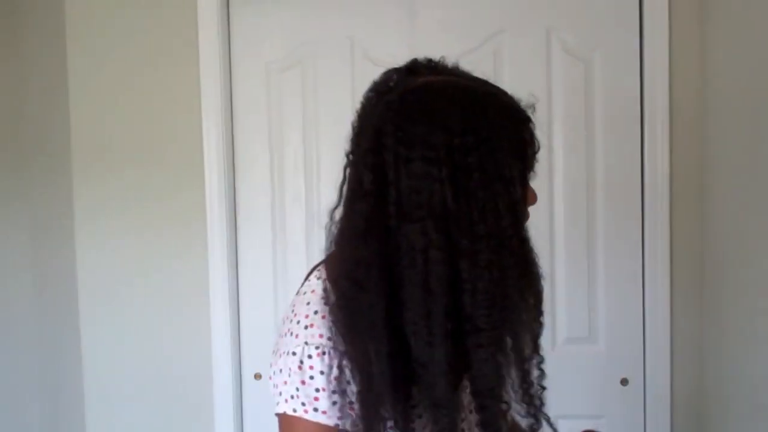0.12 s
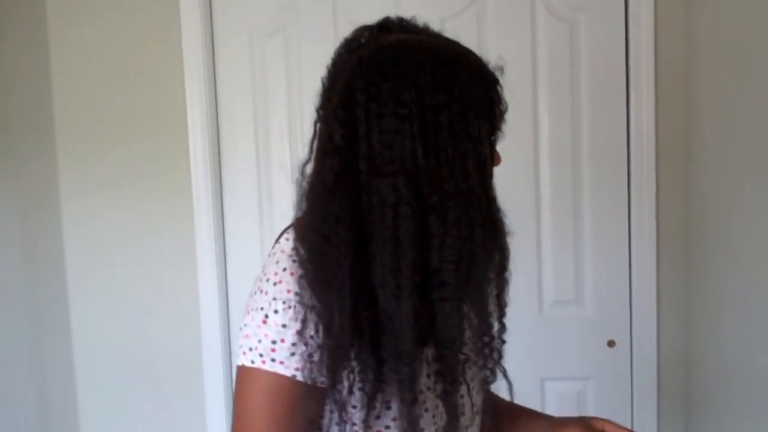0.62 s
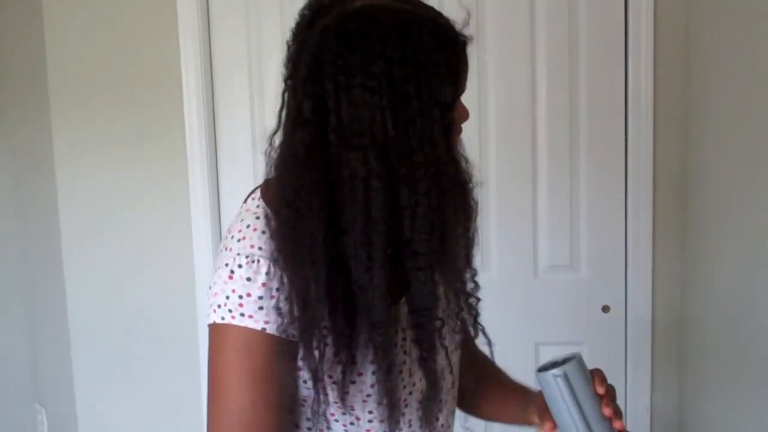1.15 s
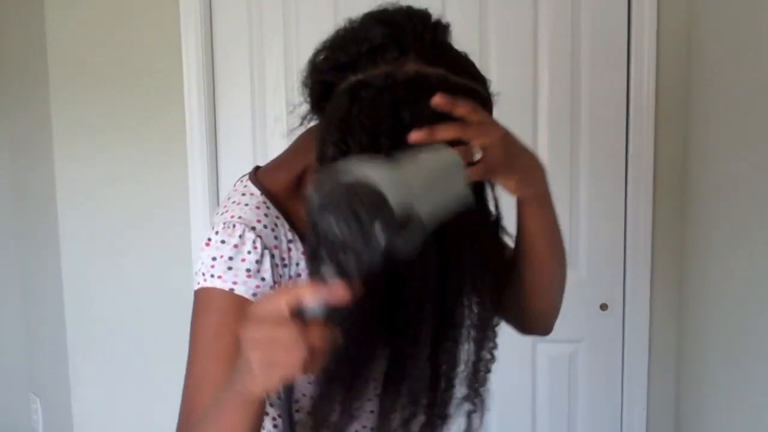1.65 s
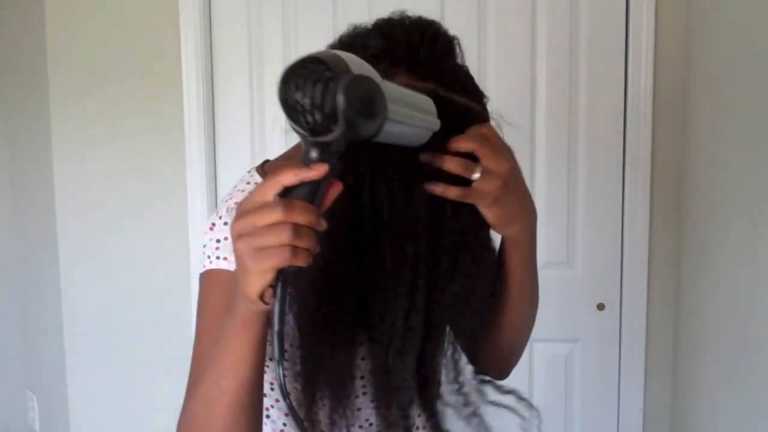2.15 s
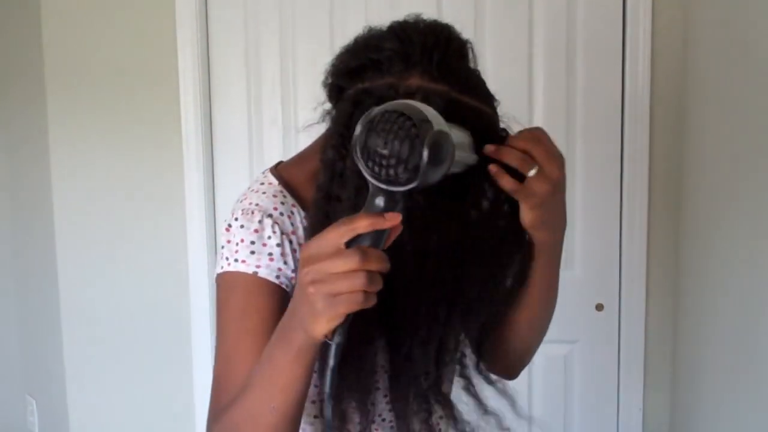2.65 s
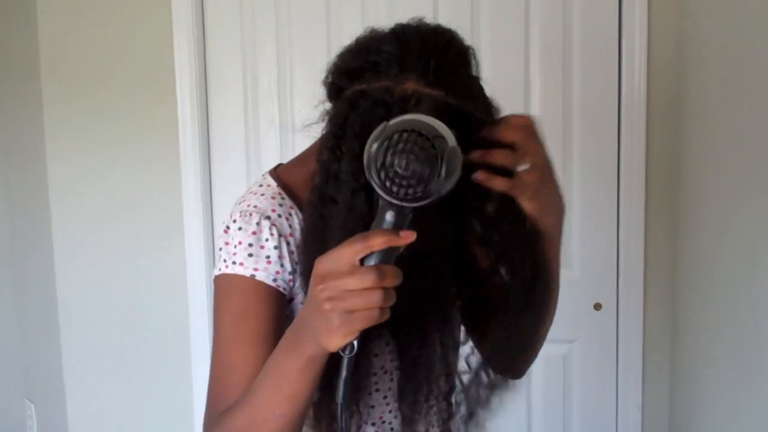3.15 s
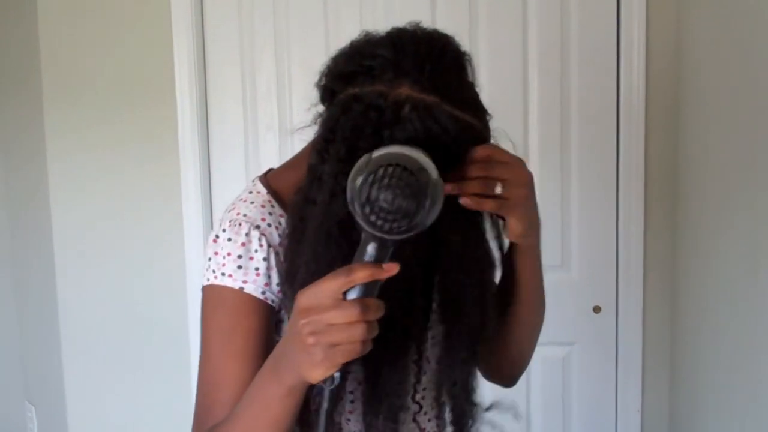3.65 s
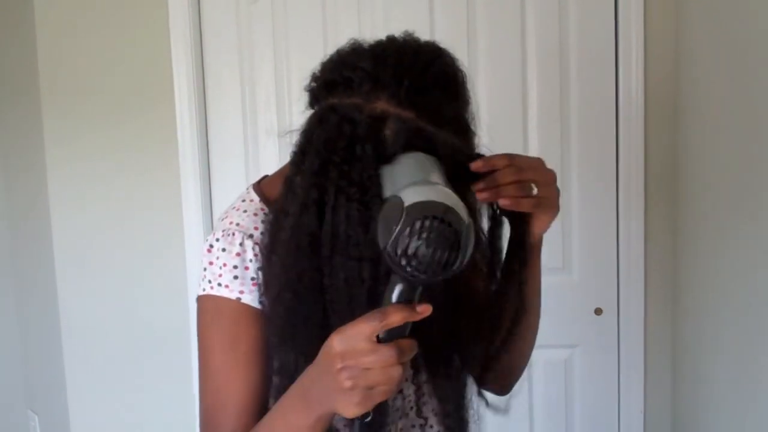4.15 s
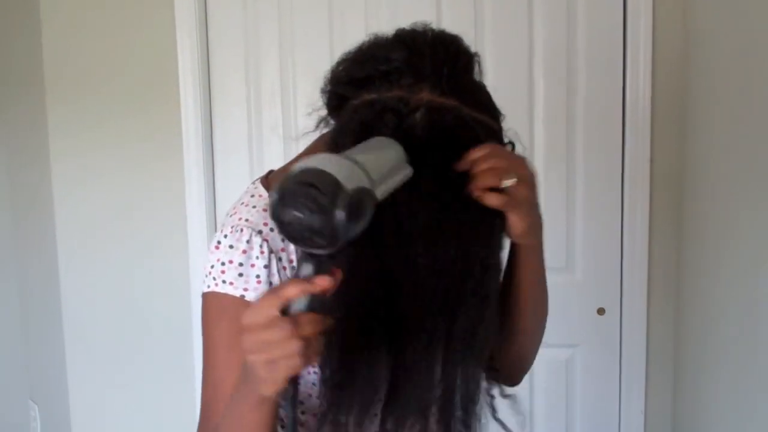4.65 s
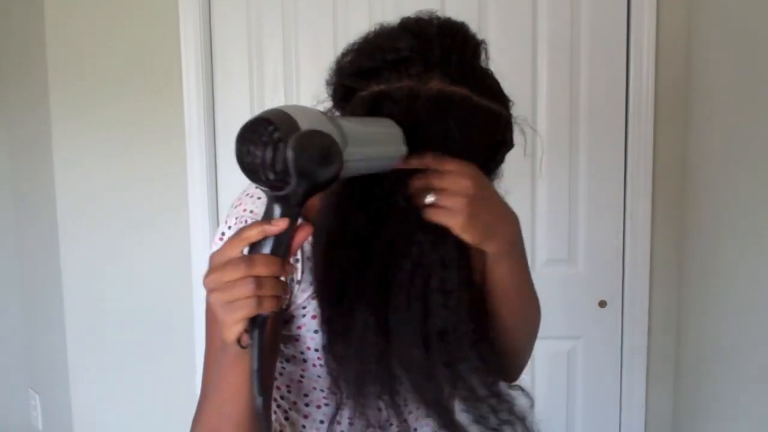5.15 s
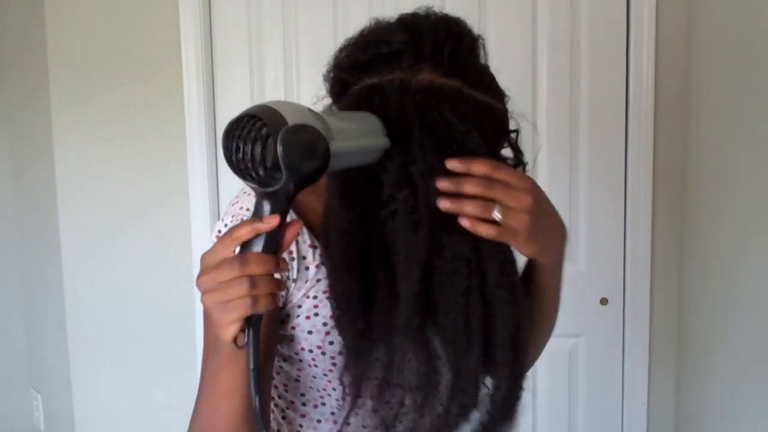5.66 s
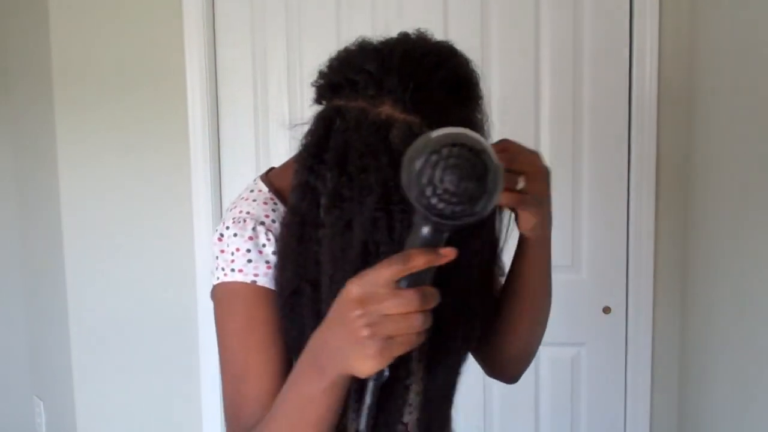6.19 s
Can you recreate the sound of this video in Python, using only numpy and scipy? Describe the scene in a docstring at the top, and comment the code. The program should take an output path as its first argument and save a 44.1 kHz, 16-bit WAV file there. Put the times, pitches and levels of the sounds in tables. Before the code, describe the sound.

Plastic clicks and a small scrape, then a handheld hair dryer buzzes on, spins up to a thin whine and blows steadily in a small hard room.

```python
"""A handheld hair dryer is picked up and clicked on in a small hard room, then turned about the head.
Its air is shaped noise: roar in room and barrel modes, turbulence at the blades, hiss at the grille, brief whistles.
Its motor is a stack of sines on the shaft orders that spins up to a thin whine, after a short mains buzz.
Noise bursts and damped sines make the clicks, and soft noise swells the scrapes, as the dryer is handled.
Behind it the house adds a faint wavering rumble, low hum tones, one distant thud and a soft hiss."""
import sys
import numpy as np
from scipy import signal
from scipy.fft import rfft, irfft, next_fast_len
from scipy.io import wavfile
from scipy.ndimage import uniform_filter1d, map_coordinates

SR = 44100
rng = np.random.default_rng(int(sys.argv[2]) if len(sys.argv) > 2 else 0)


def linear_from_db(decibels):
    """Turn decibels (scalar or array-like) into linear amplitude factors; 0 gives 1."""
    return 10 ** (np.asarray(decibels, float) / 20)


def transcribe(signal):
    """Save signal, clipped to [-1, 1], as a 16-bit WAV file at the path in sys.argv[1]."""
    frames = np.atleast_2d(signal).T
    limited = np.clip(frames, -1, 1)
    pcm = np.round(limited * 32767).astype(np.int16)
    wavfile.write(sys.argv[1], SR, pcm)


N = 277830  # length in samples

# mean shaft speed through the spin-up: (time [s], speed [turns per second])
SHAFT_SPEED = [(0.59, 20), (0.7, 102), (0.77, 137), (0.84, 171), (1, 222), (1.1, 243.5), (1.2, 255),
               (1.3, 263.5), (1.4, 267.6), (1.55, 269.7), (1.7, 273.4), (1.9, 277.1), (2.2, 278.3),
               (2.45, 278.7), (3, 278), (3.8, 278.5), (6.3, 278)]
# left-right likeness of sound from all round the room: (frequency [Hz], likeness [0-1])
DIFFUSE_LIKENESS = [(40, 0.94), (80, 1), (150, 0.94), (450, 0.75), (900, 0.61), (1600, 0.55), (3200, 0.16),
                    (6000, .02)]


def unit(x):
    """Scaled to rms 1."""
    return x / np.sqrt(np.mean(x ** 2) + 1e-20)


def along(points, hz):
    """Value at hz of (Hz, value) points on a log frequency axis."""
    f, v = np.transpose(points)
    return np.interp(np.log(hz + 1), np.log(f + 1), v)


def curves(rows, outside=-120):
    """One value per sample for each column after the time; a set value outside the table."""
    s, *columns = np.transpose(rows)
    t = np.arange(N) / SR
    return [np.interp(t, s, column, left=outside, right=outside) for column in columns]


def wobble(rate):
    """A smooth random curve, rate knots a second."""
    at = np.arange(0, N + 64, 64)
    knots = rng.standard_normal(int(N * rate / SR) + 4)
    return np.interp(np.arange(N), at, map_coordinates(knots, [at * rate / SR]))


def bump(s, width_s):
    """A bell-shaped swell of height 1 and standard deviation width_s."""
    return np.exp(-.5 * ((np.arange(N) / SR - s) / width_s) ** 2)


def filtered(x, response):
    """x filtered by a complex response of frequency."""
    m = next_fast_len(x.shape[-1] + 8192)
    spectrum = rfft(x, m) * response(np.fft.rfftfreq(m, 1 / SR))
    return irfft(spectrum, m)[..., :x.shape[-1]]


def modes(table, steep):
    """Power sum of (Hz, width Hz, dB) resonance peaks; steep over 1 darkens the skirts."""
    return lambda f: np.sqrt(sum(linear_from_db(2 * db) * (1 + (2 * (f - c) / w) ** 2) ** -steep for c, w, db in table))


def shape(spectrum):
    """Gain of a (Hz, dB) spectrum."""
    return lambda f: linear_from_db(along(spectrum, f))


def spread(pair, likeness):
    """Two unrelated signals to left and right, sharing as much at each frequency as likeness says."""
    turn = lambda hz: np.arccos(np.clip(along(likeness, hz), 0, 1)) / 2
    mid, side = filtered(pair, lambda hz: np.array([np.cos(turn(hz)), np.sin(turn(hz))]))
    return np.array([mid + side, mid - side])


def rush(colour, patchy_db, frames=12, likeness=None):
    """Stereo noise of rms 1 in patches of random gain; long ones drift as the dryer moves among reflections."""
    # left-right likeness of the near dryer: (frequency [Hz], likeness [0-1])
    near_likeness = [(150, 0.96), (380, 0.98), (950, 0.87), (2370, 0.62), (5000, 0.21), (8000, 0.44),
                     (14900, 0.11)]
    z = signal.stft(rng.standard_normal((2, N)), nperseg=512)[2]
    field = uniform_filter1d(rng.standard_normal(z.shape[1:]), size=2, axis=0)
    for _ in range(2):
        field = uniform_filter1d(field, size=frames, axis=1)
    pair = signal.istft(z * linear_from_db(patchy_db * unit(field)), nperseg=512)[1][:, :N]
    return unit(spread(filtered(pair, colour), near_likeness if likeness is None else likeness))


def layer(full_db, power, aim_db):
    """A level in dB that follows a power of shaft speed and how far the nozzle is in view."""
    # barrel opening toward the microphone: (time [s], aim [0 intake grille in front, 1 nozzle in view])
    aim = [(0.59, 0.52), (0.9, 1.14), (1.13, 1.13), (1.43, .95), (1.55, 0.45), (1.75, 0.43), (1.95, 0.45),
           (2.15, 0.57), (2.4, 0.12), (3.0, 0.34), (3.55, -0.11), (3.9, 0.49), (4.55, 0.13), (4.95, 0.55),
           (5.15, 0.35), (5.4, 0.73), (5.55, 0.81), (5.75, 0.44), (6.3, -0.33)]
    full_hz = 249  # above this shaft speed the level stops growing
    speed = curves(SHAFT_SPEED, outside=.01)[0]
    growth_db = power * 20 * np.log10(np.minimum(speed / full_hz, 1))
    return full_db + growth_db + aim_db * curves(aim, outside=0)[0]


def barrel_roar(slow):
    """Turbulent flow excites low room modes and the barrel's first and second mode."""
    # resonances of room, first and second barrel mode: (frequency [Hz], width [Hz], level [dB])
    room_modes = [(231.5, 40, -6.5), (328, 28, -4.5), (384, 76, -1.5), (486, 11.4, 0.5), (542, 56, 2)]
    first_mode = [(615, 25, -5), (675, 50, 1), (755, 110, -1.5), (850, 45, -4), (970, 200, -5)]
    second_mode = [(1643, 60, 1.5), (1473, 260, -2.5)]
    room = rush(modes(room_modes, steep=2.07), patchy_db=0.5)
    first = rush(modes(first_mode, steep=1.44), patchy_db=1.65, frames=slow)
    second = rush(modes(second_mode, steep=1.56), patchy_db=4.5)
    return (linear_from_db(layer(full_db=-44, power=1.26, aim_db=1.1)) * room
            + linear_from_db(layer(full_db=-34, power=1.84, aim_db=4.8)) * first
            + linear_from_db(layer(full_db=-43, power=3.2, aim_db=11)) * second)


def barrel_whistle():
    """The barrel whistles briefly near its second mode: swelling sines whose phase drifts."""
    # whistles: (time of the peak [s], rise and fall [s], pitch [Hz], level [dB])
    whistles = [(1.43, .02, 1560, -31), (4.95, .12, 1625, -39), (5.51, .075, 1635, -32.5)]
    phase = 2 * np.pi * np.arange(N) / SR
    drift = .7 * wobble(30)
    return sum(linear_from_db(db) * bump(s, width) * np.sqrt(2) * np.sin(hz * phase + drift)
               for s, width, hz, db in whistles)


def blade_turbulence(slow):
    """Broad noise of turbulence at the blades, growing with shaft speed."""
    # spectrum of the turbulence: (frequency [Hz], density [dB per Hz])
    turbulence = [(900, -41), (1150, -6), (1300, -8), (1500, -1.5), (2000, 0.5), (2350, -1), (2900, 0),
                  (3450, -0.5), (3700, -5), (5000, -20.5)]
    noise = rush(shape(turbulence), patchy_db=1.0, frames=slow)
    return linear_from_db(layer(full_db=-25.5, power=2.8, aim_db=0.84)) * noise


def grille_hiss(slow):
    """Air hisses at the grille; the top of the hiss needs more speed to start."""
    # spectrum of the hiss: (frequency [Hz], density [dB per Hz])
    hiss_spectrum = [(2400, -56), (3300, -12.5), (3800, -5.5), (4550, -1.5), (5940, -2.5), (9930, -6),
                     (13700, -3), (14300, -9)]
    split_hz = 5200
    hiss = rush(shape(hiss_spectrum), patchy_db=0.67, frames=slow)
    top = filtered(hiss, lambda hz: 1 / (1 + (split_hz / (hz + 1)) ** 4))
    return (linear_from_db(layer(full_db=-22.5, power=3.3, aim_db=1.14)) * (hiss - top)
            + linear_from_db(layer(full_db=-21, power=3.9, aim_db=-1.2)) * top)


def air():
    """All the flow noise of the dryer; eddies flutter the whole stream a little."""
    slow = 50  # smoothing of the slow patches, in frames of 256 samples
    low_hz = 205  # the small fan radiates almost nothing below this
    flutter_db = 0.45 * wobble(5.8) + 0.28 * wobble(25)
    stream = barrel_roar(slow) + barrel_whistle() + blade_turbulence(slow) + grille_hiss(slow)
    return filtered(linear_from_db(flutter_db) * stream, lambda hz: 1 / np.sqrt(1 + (low_hz / (hz + 1)) ** 10))


def motor():
    """Shaft orders on a slightly unsteady speed; each reaches the two ports a little differently."""
    # the two blade tones: (time [s], level of order 4 [dB], level of order 8 [dB])
    whine = [(0.72, -54, -64), (0.84, -38, -64), (0.95, -61, -61), (1.03, -33, -32), (1.07, -46, -48),
             (1.2, -41, -34), (1.32, -27.5, -46), (1.48, -34, -39), (1.56, -41, -30.5), (1.66, -29.5, -33),
             (1.86, -37, -33), (1.97, -39, -31), (2.08, -34, -39), (2.3, -36, -33), (2.41, -35.5, -27),
             (2.55, -33, -32.5), (2.75, -34, -32.5), (3.2, -32.5, -31), (3.5, -33, -31), (3.84, -33, -30.5),
             (4.17, -33, -38.5), (4.5, -34, -34), (4.72, -36.5, -33), (4.85, -40.5, -38), (5.03, -37, -45),
             (5.12, -39, -29.5), (5.27, -36, -40), (5.4, -34, -30.5), (5.6, -34.5, -39), (5.8, -45, -29.5),
             (5.95, -38, -34), (6.15, -33, -29.5), (6.3, -32, -40)]
    # weak orders: (order, level at full speed [dB], power of speed, gain in nozzle view [dB], random swing [dB])
    weak_orders = [(1, -59, 3.2, 2, 1.8), (5, -54, 1.4, 12, 3)]
    # resonances that a weak order lights up while gliding through: (frequency [Hz], width [Hz], gain [dB])
    passed = [(238, 35, 6), (860, 50, 19), (1125, 60, 10), (1250, 80, 2)]
    speed = curves(SHAFT_SPEED, outside=0)[0]
    turns = 2 * np.pi * np.cumsum(speed + 0.1274 * wobble(6)) / SR  # shaft angle [rad]
    levels = {4 * (i + 1): db + 0.74 * wobble(8.1) for i, db in enumerate(curves(whine))}
    for order, *law, swing_db in weak_orders:
        order = round(order)
        lit_db = sum(db / (1 + (2 * (order * speed - hz) / width) ** 2) for hz, width, db in passed)
        levels[order] = layer(*law) + lit_db + swing_db * wobble(7)
    out = np.zeros((2, N))
    for order, db in levels.items():
        lean = order / 8 * np.array([[1], [-1]])  # opposite left and right, wider for high orders
        waver_db = 2.05 * wobble(35) + lean * (0.74 + 1.4 * wobble(2.33))
        tone = np.sin(order * turns + 0.21 * lean * wobble(1.57))
        out = out + np.sqrt(2) * linear_from_db(db + waver_db) * tone
    return out


def mains_buzz():
    """Mains ripple rings the housing as current first flows: one gliding sine."""
    # the ring: (time [s], pitch [Hz], level [dB])
    ripple = [(0.59, 714, -61), (0.652, 714, -39.5), (0.676, 712, -37), (0.712, 710, -51), (0.75, 720, -34),
              (0.78, 690, -36)]
    pitch = curves(ripple, outside=0)[0]
    level_db = curves(ripple)[1]
    phase = 2 * np.pi * np.cumsum(pitch) / SR
    return np.sqrt(2) * linear_from_db(level_db) * np.sin(phase + [[.25], [-.25]])


def clicks():
    """Each click of handle or switch is a sharp crack, a brief ring and a rattle of the plastic shell."""
    # plastic clicks: (time [s], level [dB], rattle t60 [s], brightness [dB per octave])
    click_table = [(0.0565, -29, 0.063, 1), (0.2276, -34.5, .05, -3.5), (0.272, -35, .04, -2.2),
                   (.2970, -24, 0.078, 2), (.3824, -42, .04, -3), (0.462, -45, .02, 9),
                   (.5352, -31.5, 0.047, -5.5), (0.585, -33, .03, -6), (0.589, -21, 0.041, 3.5),
                   (0.5904, -25.5, 0.03, -2)]
    # spectrum of crack and rattle: (frequency [Hz], density [dB per Hz])
    snap = [(400, -45), (900, -13), (1700, -7), (2830, -3), (3690, -4), (4980, -2.5), (8770, -4),
            (11200, -4), (14200, -5)]
    # modes of the plastic shell: (frequency [Hz], level [dB], t60 [s])
    shell = [(3100, -11, .004), (4900, -6, .004), (6100, -8, .004)]
    out = np.zeros(N)
    t = np.arange(SR // 5) / SR
    for s, db, t60, tilt in click_table:
        bright = lambda f: linear_from_db(tilt * np.log2((f + 100) / 5000))
        crack = linear_from_db(2.5 - 60 * t / 0.007) * rng.standard_normal(len(t))
        rattle = linear_from_db(-5.5 - 60 * t / max(t60, .01)) * rng.standard_normal(len(t))
        burst = filtered(crack + rattle, lambda f: shape(snap)(f) * bright(f))
        ring = sum(bright(hz) * linear_from_db(mode_db - 60 * t / ring_s) * np.sin(2 * np.pi * hz * t)
                   for hz, mode_db, ring_s in shell)
        out[round(s * SR):][:len(t)] += linear_from_db(db) * (burst + ring)
    return out


def scrapes():
    """Dull scrapes of the housing: resonant noise in short swells."""
    # swells: (time of the peak [s], rise and fall [s], level [dB])
    strokes = [(.397, 0.014, -54), (.436, 0.01, -47.5), (.466, .007, -54)]
    # resonances of the scraped housing: (frequency [Hz], width [Hz], level [dB])
    housing = [(510, 90, 3.5), (1380, 900, -7)]
    noise = unit(filtered(rng.standard_normal(N), modes(housing, steep=1.35)))
    return sum(linear_from_db(db) * bump(s, width) for s, width, db in strokes) * noise


def walls(x):
    """Diffuse answer of the hard walls; each frequency dies at its own speed."""
    # decay of the room: (frequency [Hz], t60 [s])
    decay = [(200, 0.22), (2000, 0.32), (10000, 0.16)]
    hz, t, z = signal.stft(rng.standard_normal((2, SR // 2)), SR, nperseg=256)
    fading = z * linear_from_db(-60 * t / along(decay, hz)[:, None])
    tail = spread(signal.istft(fading, SR, nperseg=256)[1], DIFFUSE_LIKENESS)
    delayed = np.pad(x, (160, 0))[None]  # the answer starts 160 samples late
    return signal.fftconvolve(delayed, tail / np.linalg.norm(tail[0]), axes=1)[:, :N]


def house():
    """Distant ventilation: a wavering rumble with low tones, one thud, and a soft hiss."""
    # level of the low sound, which sinks after about 1.3 s: (time [s], level [dB])
    low_level = [(0, -58), (.55, -58), (1.05, -56.5), (1.35, -61), (1.9, -66), (2.05, -63), (3.3, -63),
                 (4.8, -65), (5.4, -61.5), (6.3, -65)]
    # hum tones before their random swing: (frequency [Hz], level [dB])
    hum_tones = [(56, -12), (84, -6), (120, -15)]
    # spectra of rumble and hiss: (frequency [Hz], density [dB per Hz])
    rumble_spectrum = [(20, -36), (44, -21), (54, -9), (70, -1), (110, -0.5), (150, -2), (200, -26),
                       (400, -40)]
    hiss_spectrum = [(120, -34), (240, -0.5), (473, 1.5), (834, -6), (1550, -8), (2600, -10.5),
                     (5000, -9.5), (14300, -8), (14400, -120)]
    thud_db = 12 * bump(4.25, .08)  # a swell of rumble and hum
    level_db = curves(low_level, outside=-66)[0] + thud_db + 2.2 * wobble(6)
    t = np.arange(N) / SR
    hum = sum(linear_from_db(db + 2.5 * wobble(4)) * np.sin(2 * np.pi * hz * t + 1.5 * wobble(5) + [[.22], [-.22]])
              for hz, db in hum_tones)
    rumble = rush(shape(rumble_spectrum), patchy_db=.4, likeness=DIFFUSE_LIKENESS)
    low = linear_from_db(level_db) * (linear_from_db(-4.5) * rumble + hum) * linear_from_db([[.7], [-.7]])  # a little louder at left
    hiss = rush(shape(hiss_spectrum), patchy_db=1.0, likeness=DIFFUSE_LIKENESS)
    return low + linear_from_db(-54) * hiss


def scene():
    """Dryer and hands in the room, over the house."""
    lag_s = 28e-6  # the clicks, off to one side, reach the far port this late
    flow = air()
    hands = clicks() + scrapes()
    direct = filtered(hands, lambda hz: np.exp(1j * np.pi * hz * lag_s * np.array([[1], [-1]])))
    dryer = flow + linear_from_db(-16) * walls(flow[0]) + motor() + mains_buzz()
    return dryer + direct + linear_from_db(-2.5) * walls(hands) + house()


def top_cut(x):
    """Nothing passes above the cut-off."""
    return signal.sosfilt(signal.butter(12, 15540, fs=SR, output="sos"), x)


def record(dry):
    """The recorder keeps nothing above its band limit."""
    top_hz = 14200
    mix = filtered(dry, lambda hz: hz < top_hz)
    return top_cut(mix)


dry = scene()
out = record(dry)
transcribe(out)
```